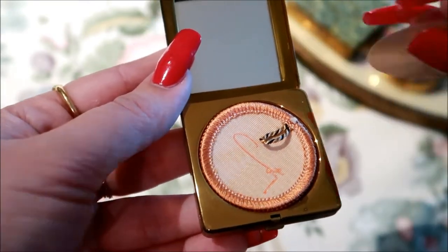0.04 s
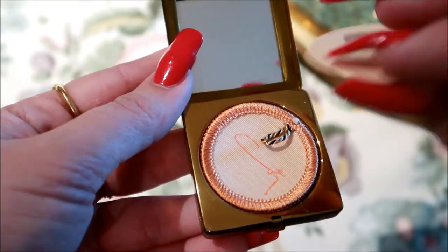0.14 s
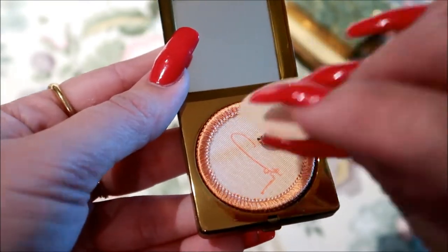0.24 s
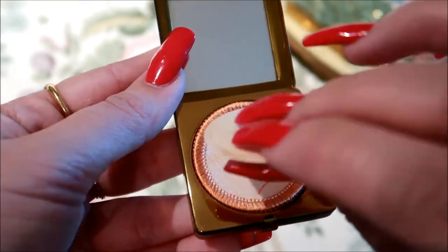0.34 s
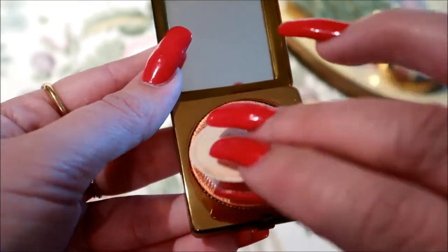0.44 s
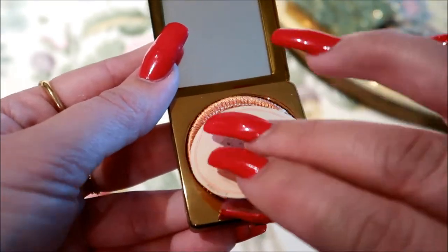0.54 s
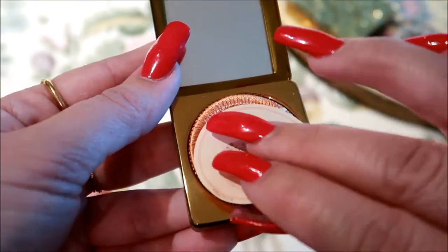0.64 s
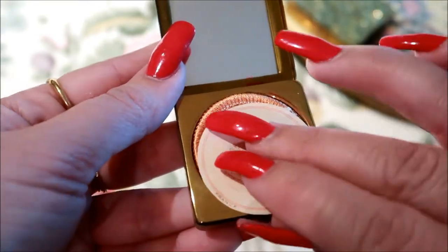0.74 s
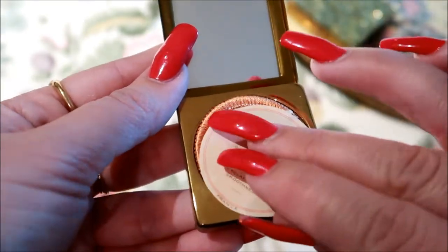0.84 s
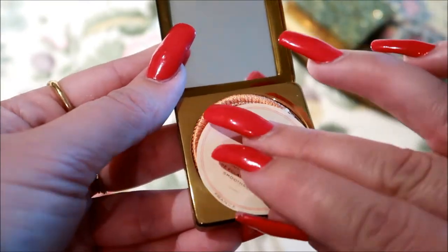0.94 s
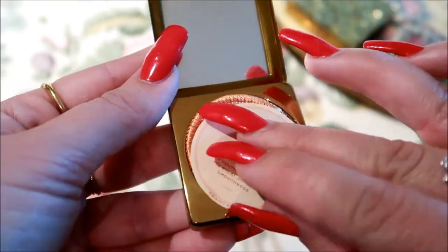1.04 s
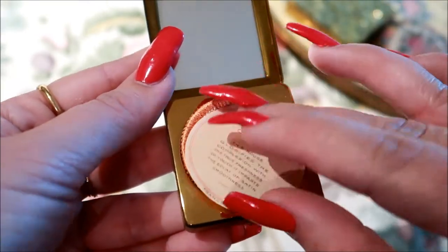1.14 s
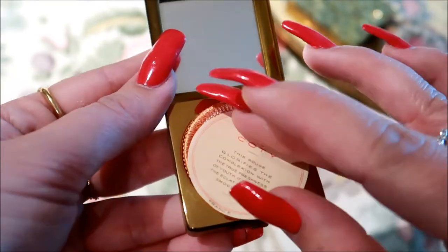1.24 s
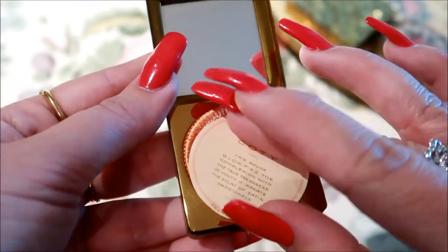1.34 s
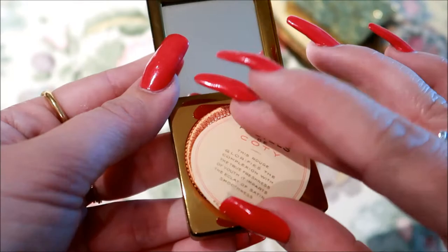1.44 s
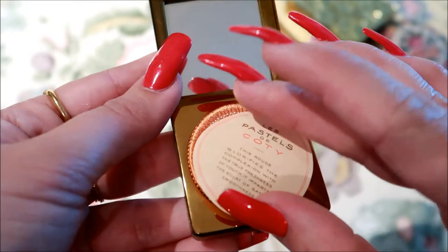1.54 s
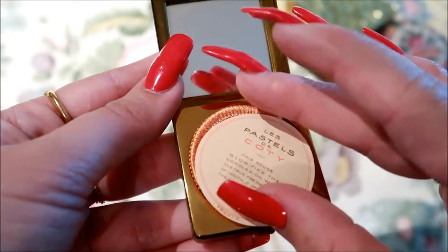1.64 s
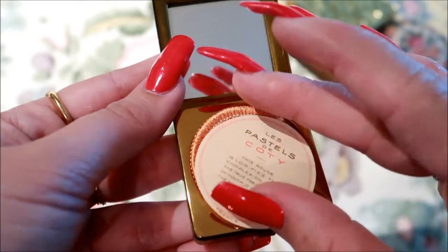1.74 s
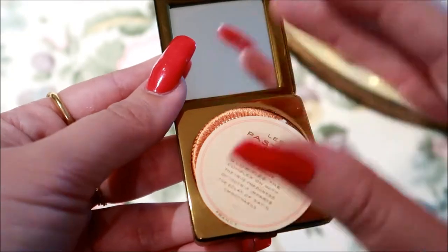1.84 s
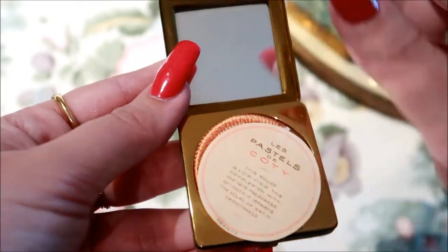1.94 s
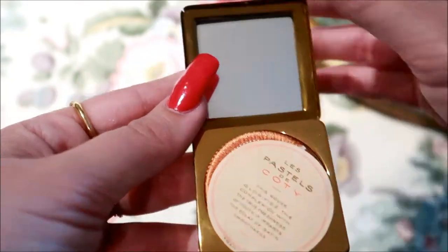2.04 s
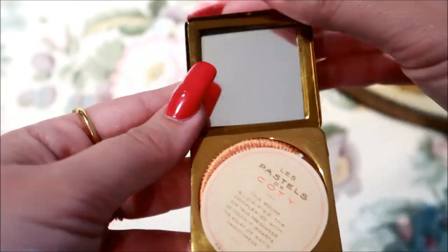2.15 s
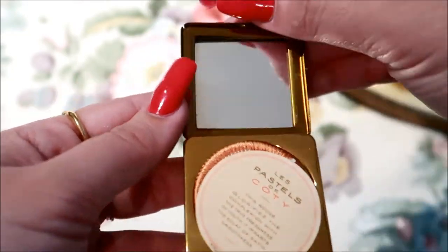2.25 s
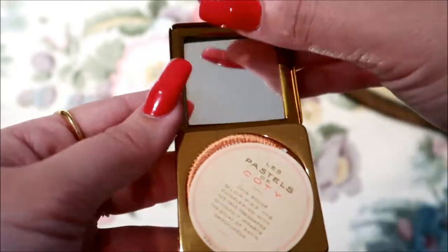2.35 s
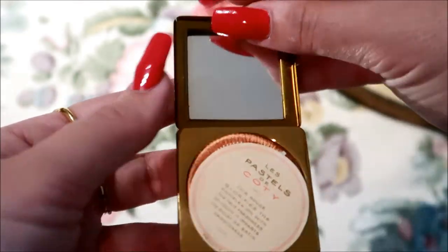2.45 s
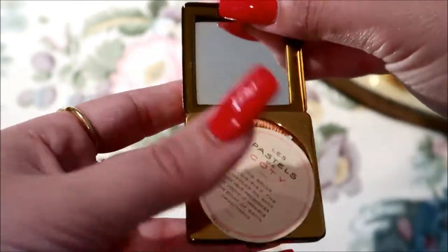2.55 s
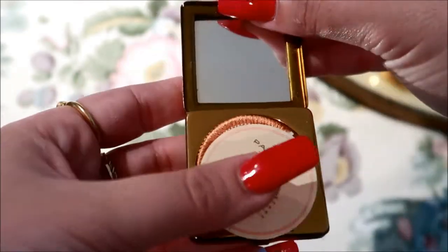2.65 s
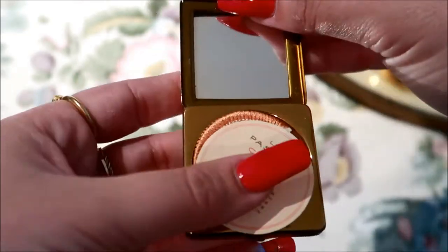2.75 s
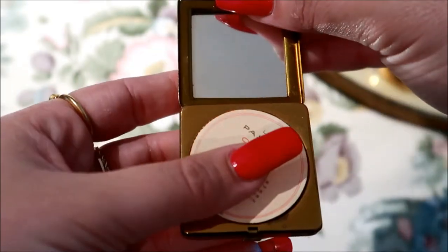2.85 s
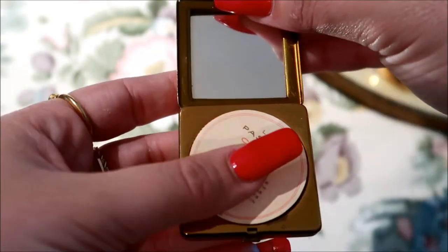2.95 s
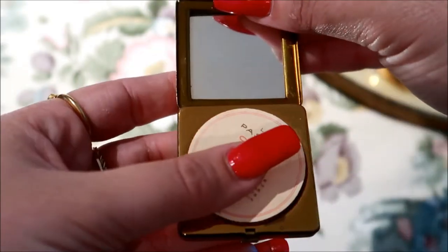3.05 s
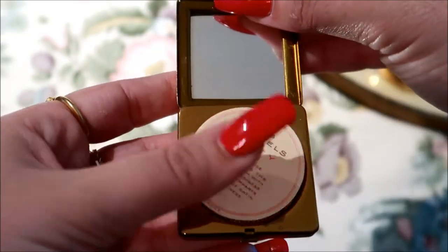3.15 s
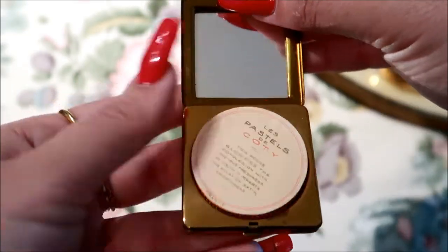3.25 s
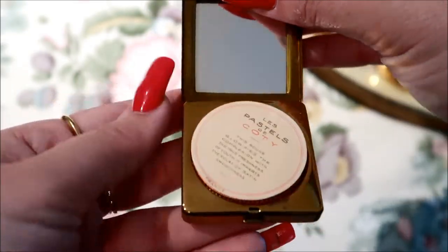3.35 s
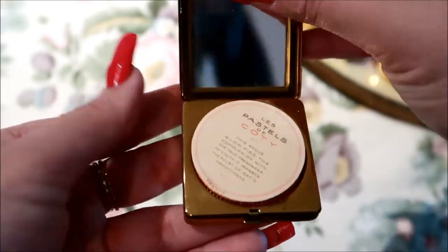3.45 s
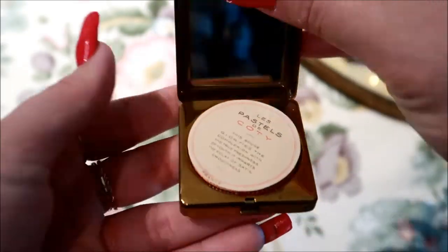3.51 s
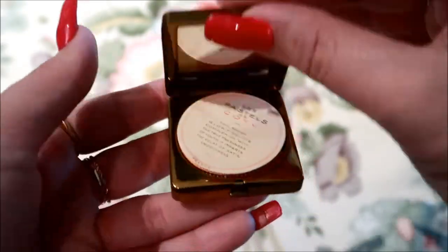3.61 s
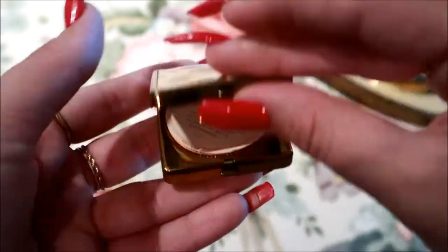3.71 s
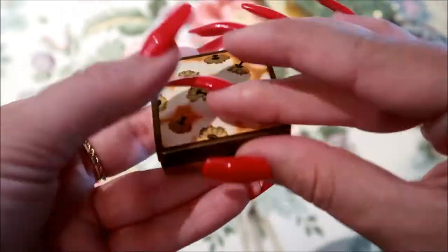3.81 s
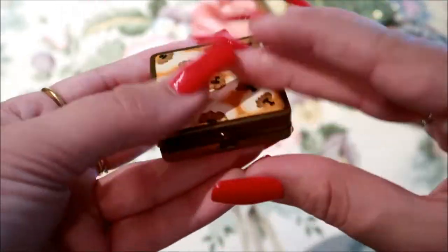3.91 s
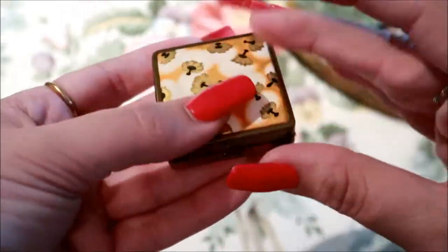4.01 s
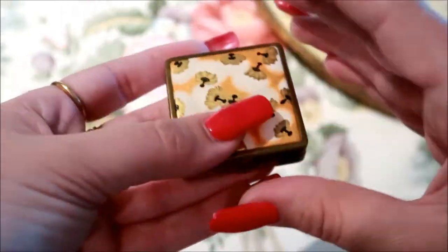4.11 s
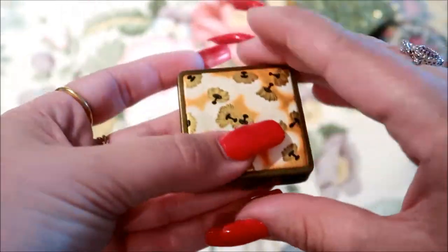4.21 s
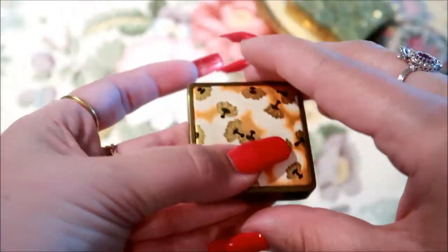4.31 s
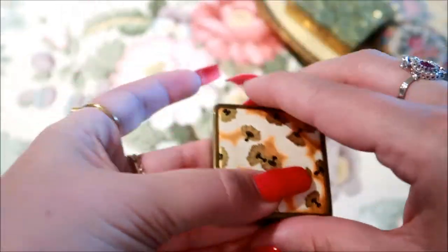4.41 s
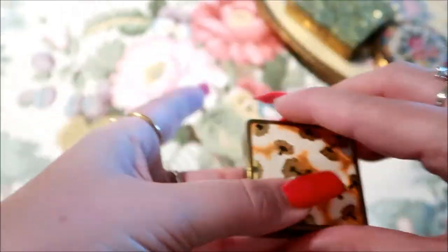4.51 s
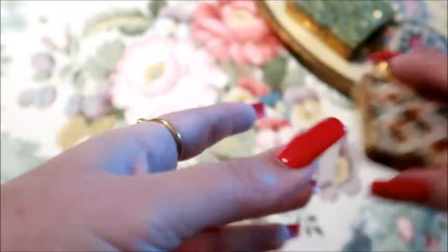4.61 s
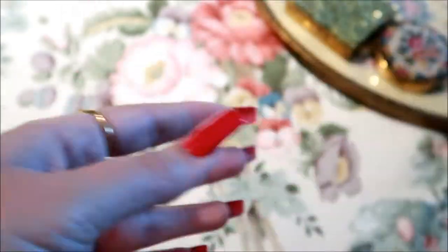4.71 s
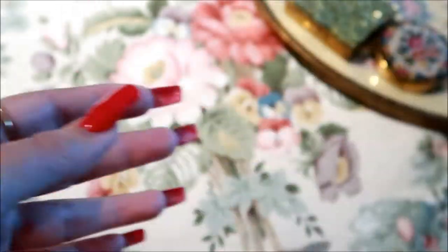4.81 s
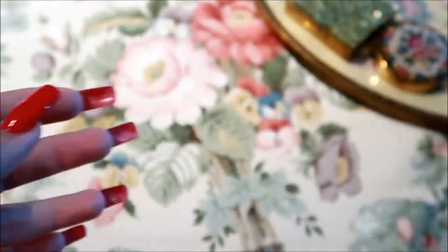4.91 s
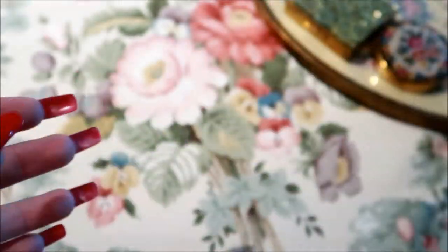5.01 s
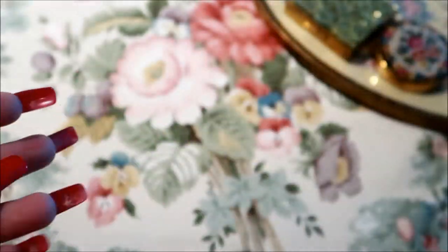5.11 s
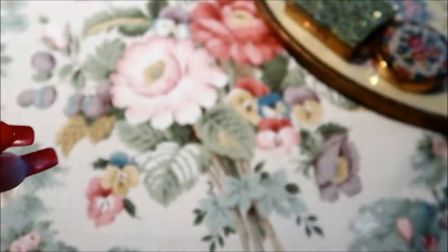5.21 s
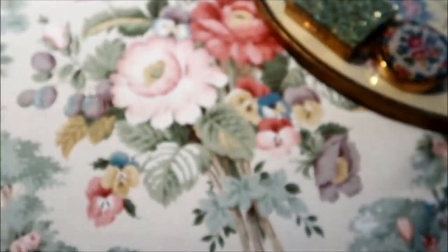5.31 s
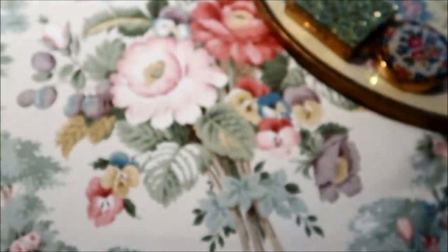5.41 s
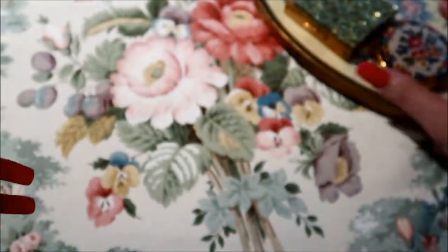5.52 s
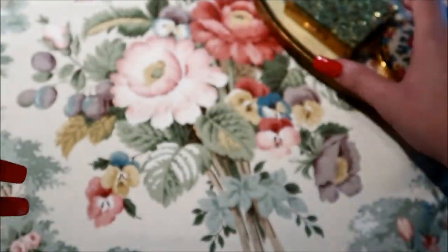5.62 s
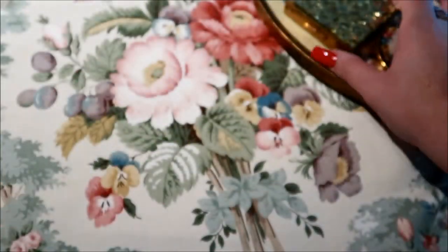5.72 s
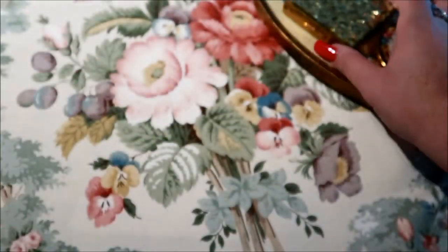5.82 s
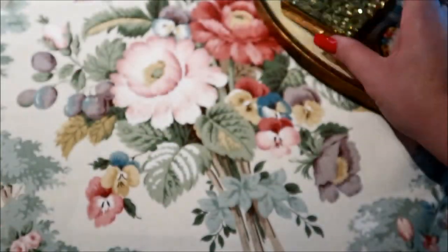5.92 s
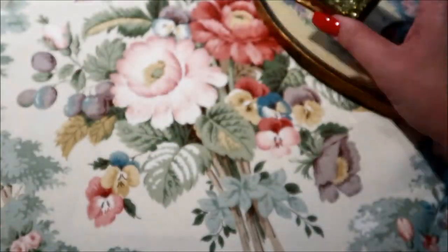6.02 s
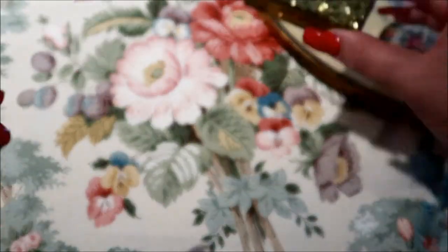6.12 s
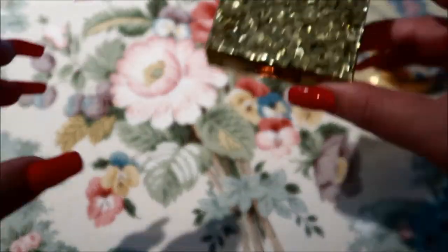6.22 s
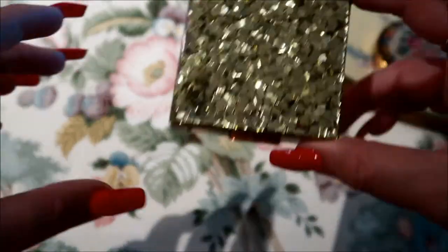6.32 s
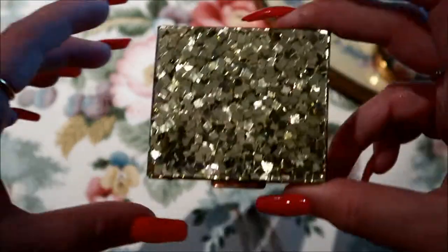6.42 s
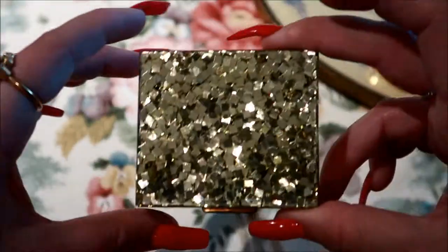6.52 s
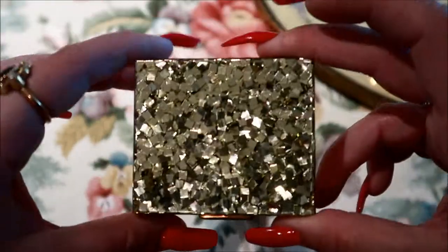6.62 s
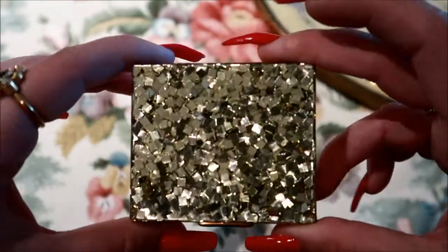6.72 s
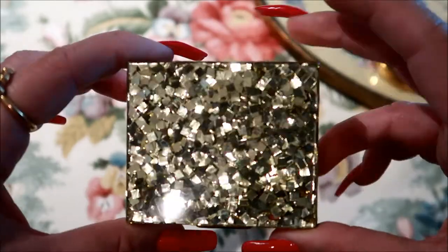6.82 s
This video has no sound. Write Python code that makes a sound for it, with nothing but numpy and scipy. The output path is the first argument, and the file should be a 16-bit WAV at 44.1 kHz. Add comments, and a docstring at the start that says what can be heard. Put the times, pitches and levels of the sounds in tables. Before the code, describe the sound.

Close to the microphone in a quiet room, a small metal compact is handled: irregular light fingernail clicks and soft slides of skin and nail, thinning out over time. A click precedes the crisp snap of the lid closing, the loudest sound. A lower knock follows as the compact lands on a table, then a few small clinks of another case against a tray. A faint motor hum and hiss lie underneath.

```python
"""Long fingernails tap and slide on a small metal powder compact, close by in a quiet room. The lid snaps
shut, the compact is set down on a table and a second case is lifted off a tray. Each contact is a short
force pulse that excites the damped normal modes of the body it meets; the room adds reflections.
Behind it all a motor hums faintly over microphone hiss."""
import sys
import numpy as np
from scipy import signal
from scipy.io import wavfile
from scipy.ndimage import uniform_filter1d

SR = 44100
rng = np.random.default_rng(int(sys.argv[2]) if len(sys.argv) > 2 else 0)


def wrap_up_sound(samples):
    """Save the sound to the file named by the first command line argument, as 16-bit audio."""
    columns = np.atleast_2d(samples).T
    # keep every value between -1 and 1, then stretch to whole-number steps
    tamed = np.clip(columns, -1, 1)
    steps = np.round(tamed * 32767).astype(np.int16)
    wavfile.write(sys.argv[1], SR, steps)


N = 302526


# Modes of the open compact: f/Hz, relative level/dB, T60/s
OPEN_MODES = [(344, 17, 0.025), (760, 8, 0.04), (1090, 4.5, 0.035), (571, 5, 0.0266), (1624, 6, 0.037),
              (1860, 11, 0.024), (2230, 2, 0.033), (2620, 11.5, 0.01), (3150, 1.5, 0.029), (3740, 4, 0.029),
              (4140, 6, 0.02), (4484, 10.5, 0.0083), (5800, 4, 0.005), (6915, -0.5, 0.018),
              (7700, 4.5, 0.012), (9700, 10, 0.0048)]
# Bursts that make up the taps: t/s, level/dB (rms if packed into 1 ms), centre/octaves above 1 kHz,
# breadth/octaves, burst time/ms, factor on T60 (small when fingers damp the body).
# A fading ring opens; the tap at 0.363 s has two layers, a broad click and a narrow ring near 1.7 kHz.
TAP_BURSTS = [(0.0, -33.5, 1.74, 0.85, 22, 0.39), (.2055, -50.5, 3.1, 0.9, 0.43, 0.67),
              (.287, -37, 0.19, 1.3, 5.8, .35), (.3632, -27.5, 0.5, 2.7, 0.46, 0.52),
              (.3637, -28.5, 0.8, .3, .5, 0.66), (.3772, -30.5, 0.2, 2.2, 2.3, 0.59),
              (.603, -43, 1.53, 1, 3, 0.47), (.662, -29.5, 0.32, 1.6, 1.8, 0.38),
              (.714, -44.5, 1.64, 0.55, 2.5, 0.45), (.731, -44.5, 2.1, 0.59, 1.9, 0.43),
              (.8678, -29, 1.95, 1.3, 2.5, 0.3), (.871, -17.5, 2.04, 0.44, 0.3, 0.32),
              (.8728, -22.5, 0.63, 1, 0.73, 0.4), (.8842, -37, 2, 0.8, 0.5, .4),
              (1.008, -49, 2.25, 1.1, 1.5, 0.62), (1.3662, -28.5, 2, 4.8, 0.92, 0.44),
              (1.371, -27.5, 1.83, 1.2, 0.69, 0.34), (1.584, -34, 1.96, 0.48, 3.2, 0.32),
              (2.32, -45, 3.35, 2.4, 0.45, 0.52), (2.9165, -47, 2.8, .8, 0.87, 0.71),
              (2.9455, -39, 2.7, 1.6, 0.41, .5), (2.964, -46, .85, .3, 0.96, 0.66),
              (2.985, -46, 2.1, 1.2, 0.9, .5), (2.9942, -45, 2.7, 0.6, .7, .5),
              (3.001, -46, 2.3, 0.7, 0.81, 0.55), (3.9555, -38.5, 0.73, 0.57, 1.6, .5),
              (3.9595, -23.5, 1, 1.37, 0.18, 0.63), (3.974, -35.5, 3.2, 2.6, 0.42, 0.42),
              (4.023, -46, 1.8, 2.7, 0.59, .5), (4.0555, -40, 3.3, 1.3, 0.3, 0.31),
              (4.567, -43, 2.4, 0.6, 0.81, .5), (4.667, -40.5, 3, 0.82, 0.26, .5)]
def nail_taps():
    """Damped vibration: nail taps ring the open compact, some with a short echo about 14 ms later."""
    return modal_bursts(TAP_BURSTS, OPEN_MODES, crack_db=30, crack_t60=0.025)


# Strokes of skin and nail: t/s, duration/s, rms level/dB, centre/octaves above 1 kHz
STROKES = [(0.719, 0.11, -64, 2.36), (0.805, 0.09, -60.5, 2.4), (1.001, 0.12, -70.5, 2.05),
           (1.213, 0.15, -67, 2.34), (1.633, 0.061, -65.5, 2.14), (1.726, 0.0578, -60, 2.13),
           (1.917, 0.067, -64.5, 1.85), (2.922, 0.066, -55, 2.65), (2.972, 0.047, -60.5, 2.2),
           (4.64, 0.041, -60, 2.8)]
def finger_slides(grain_db):
    """Stick-slip friction: dense slips of uneven size lightly ring the damped compact."""
    out = np.zeros(N)
    body = modal_response(OPEN_MODES, rng.standard_normal(1024), ring=0.46, crack_db=29, crack_t60=0.034)
    for start, duration, db, centre in STROKES:
        stroke = np.hanning(round(duration * SR))
        slips = rng.standard_normal(len(stroke))
        slips *= gain_of(grain_db * np.minimum(rng.exponential(size=len(stroke)), 4))
        rub = contact_filter(signal.fftconvolve(slips * stroke, body), centre, breadth=0.93)
        add(out, start, gain_of(db) * unit_rms(rub))
    return out


# Modes of the shut compact: f/Hz, relative level/dB, T60/s
SHUT_MODES = [(397, -15, 0.012), (794, 7, 0.016), (1000, 6.5, 0.012), (1770, 0, 0.015), (2320, -8, 0.013),
              (3134, 0.5, 0.0093), (3520, 0.5, 0.012), (4400, -16, 0.011), (5700, -11, 0.01),
              (6650, -2, 0.0095), (7250, -5, 0.01)]
# Bursts of the lid: t/s, level/dB, centre/octaves, breadth/octaves, burst time/ms, factor on T60
LID_BURSTS = [(4.2945, -19.5, 1.36, 1.4, 0.9, 1), (4.2961, -6, 1.12, 2.4, 0.34, 0.92),
              (4.439, -37.5, -0.34, 0.67, 1.02, 0.53)]
def lid_snap():
    """Impulsive excitation: the lid's brief, hard contact rings the fast-decaying shut case."""
    return modal_bursts(LID_BURSTS, SHUT_MODES, crack_db=15.5, crack_t60=0.011)


# Modes of the table top: f/Hz, relative level/dB, T60/s
TABLE_MODES = [(85.4, 6, 0.29), (198, 7.5, 0.19), (278, -5, 0.086), (410, 2.5, 0.093), (640, 7, 0.047),
               (950, 6.5, 0.087), (1030, 3, 0.11), (1318, 8.5, 0.049), (1730, -8, 0.055), (2020, -6, 0.042),
               (2980, -4.5, 0.039), (4850, 0, 0.025)]
# Bursts of the landing: t/s, level/dB, centre/octaves, breadth/octaves, burst time/ms, factor on T60
LANDING_BURSTS = [(5.26, -19.5, -0.35, 2.1, 2.5, 0.37), (5.2835, -10, 0.48, 2.4, 1.6, 0.48),
                  (5.297, -25, 0.31, 1.6, 1.6, 0.52), (5.322, -29, 1, 1.9, 1.2, .4)]
def table_knock():
    """Free vibration: the table top rings on in its low modes after the compact lands."""
    return modal_bursts(LANDING_BURSTS, TABLE_MODES, crack_db=26.5, crack_t60=0.091)


# Modes of the tray: f/Hz, relative level/dB, T60/s
TRAY_MODES = [(332, 21.5, 0.022), (764, 8.5, 0.054), (1170, 12, 0.021), (1790, 3.5, 0.057),
              (2150, 4.5, 0.028), (2960, 0, 0.028), (3160, 3.5, 0.04), (3520, -4.5, 0.018),
              (4000, -7, 0.041), (5030, -7, 0.069), (6200, 10.5, 0.0093), (7400, 6, 0.013)]
# Bursts of the lifting: t/s, level/dB, centre/octaves, breadth/octaves, burst time/ms, factor on T60
LIFT_BURSTS = [(5.8535, -27, 1.7, 0.85, 2, 0.61), (5.859, -33.5, 2, 0.92, 1.2, 0.41),
               (5.8858, -24.5, 1.8, 0.68, 1.5, 0.99), (5.967, -27.5, 1.9, 1.4, 0.54, .4),
               (5.9855, -28.5, 0.27, 1.2, 4.7, 0.62), (6.174, -35.5, 0.29, 0.24, 1.4, 0.3)]
def tray_clatter():
    """Repeated impact: a second case knocks the tray as it is lifted off."""
    return modal_bursts(LIFT_BURSTS, TRAY_MODES, crack_db=28.5, crack_t60=0.023)


def modal_bursts(rows, modes, crack_db, crack_t60):
    """Convolution: each row is a burst of noise that builds and dies, sent through the body's modes."""
    out, t = np.zeros(N), np.arange(4096) / SR
    for start, db, centre, breadth, burst_ms, ring in rows:
        burst_noise, body_noise = rng.standard_normal((2, 8192))
        burst = whiten(burst_noise[:len(t)] * t * np.exp(-2000 * t / burst_ms))
        body = modal_response(modes, body_noise, ring, crack_db, crack_t60, grip=0.0033)
        sound = contact_filter(signal.fftconvolve(burst, body)[:8192], centre, breadth)
        rms_in_1ms = np.sqrt(np.sum(sound ** 2) / SR * 1000)
        add(out, start, gain_of(db) * sound / rms_in_1ms)
    return out


def modal_response(modes, noise, ring, crack_db, crack_t60, grip=0):
    """Modal superposition: clear resonances stand on a crack of modes too dense to tell apart."""
    hz, t = abs(np.fft.fftfreq(len(noise), 1 / SR)), np.arange(len(noise)) / SR
    power = gain_of(crack_db) ** 2
    for (mode_hz, db, t60), shift in zip(modes, grip * noise[::-1]):
        detuning = 2 * np.pi * (hz - mode_hz * (1 + shift))  # each grip bends the modes a little
        damping = np.log(1000) / (t60 * ring)
        power = power + (gain_of(db) * SR / 2) ** 2 / (damping ** 2 + detuning ** 2)
    crack = whiten(gain_of(-60 * t / (crack_t60 * ring)) * noise)
    return np.fft.ifft(np.fft.fft(crack) * minimum_phase(np.log(power) / 2)).real


def contact_filter(x, centre, breadth, steepness=1.22):
    """Selective excitation: a contact's place and hardness pick a bell-shaped band of the spectrum."""
    octave = np.log2(abs(np.fft.fftfreq(len(x), 1 / SR)) / 1000 + 1e-3)
    log_gain = -steepness * np.log1p(((octave - centre) / breadth) ** 2)
    log_gain -= np.exp(4.4 * (octave - 3.85))  # above about 10 kHz the treble of every hit and rub fades, whatever the contact
    return np.fft.ifft(np.fft.fft(x) * minimum_phase(log_gain)).real


def whiten(burst, gap_share=0.4):
    """Inverse filtering: the spectrum evens out; the scatter in time and the deepest gaps stay."""
    spectrum = np.fft.fft(burst)
    magnitude = abs(spectrum) + gap_share * abs(spectrum).mean() + 1e-9
    return np.fft.ifft(spectrum / minimum_phase(np.log(magnitude))).real


def minimum_phase(log_gain):
    """Causality: the Hilbert transform gives the phase that belongs to a log gain."""
    return np.conj(np.exp(signal.hilbert(log_gain)))


def gain_of(db):
    """Amplitude ratio of a level in decibels."""
    return 10 ** (np.asarray(db) / 20)


def unit_rms(x):
    """Normalisation to rms 1."""
    return x / np.sqrt(np.mean(x ** 2) + 1e-20)


def curve_at(points, hz):
    """Interpolation on a log-frequency axis."""
    f, value = np.transpose(points)
    return np.interp(np.log(hz + 1), np.log(f + 1), value)


def add(mix, start, sound):
    """Superposition of a sound from start/s on."""
    part = mix[max(round(start * SR), 0):][:len(sound)]
    part += sound[:len(part)]


def direct_path(x, pan_db, lag_samples, shade_db):
    """Diffraction: the housing bends treble differently to two ports; level and delay pan the sound."""
    housing = whiten(rng.standard_normal(256) * np.hanning(256) * (np.arange(256) < 40))
    side = gain_of(shade_db) * signal.oaconvolve(np.diff(x, prepend=0), housing)[:N]
    left = np.roll(x, lag_samples) * gain_of(pan_db / 2) + side
    right = x * gain_of(-pan_db / 2) - side
    return np.array([left, right])


# Early reflections off table top, hands and walls: t/s, level/dB
REFLECTIONS = [(.0035, -27.5), (.0065, -15.5), (0.014, -21.5)]
# Reverberation time: f/Hz, T60/s
ROOM_DECAY = [(200, 0.32), (1000, 0.29), (4000, 0.28), (10000, 0.24)]
def room(x, tail_db=-14.5):
    """Reverberation: a few single echoes, then sparse reflections, each band dying at its own rate."""
    pulses = np.zeros((2, SR // 2))
    slots = np.arange(400, SR // 2 - 20, 20)  # the tail starts after 9 ms
    arrivals = slots + rng.integers(0, 20, (3, len(slots)))
    sign = rng.choice([-1., 1.], arrivals.shape)
    np.put_along_axis(pulses, arrivals[:2], 0.25 * sign[:2], 1)
    pulses[:, arrivals[2]] += sign[2]  # the microphone ports sit close and share much of the tail
    hz, t, bands = signal.stft(pulses, SR, nperseg=256)
    decay = gain_of(-60 * t / curve_at(ROOM_DECAY, hz)[:, None])
    tail = signal.istft(bands * decay, SR, nperseg=256)[1]
    tail *= gain_of(tail_db) / np.linalg.norm(tail[0])
    soft_echo = np.hanning(9) / 4  # cloth and skin dull the echoes
    for delay, db in REFLECTIONS:
        for port, skew in zip(tail, rng.integers(0, 4, 2)):
            add(port, delay + skew / SR, gain_of(db) * soft_echo)
    return signal.fftconvolve(x[None], tail, axes=1)[:, :N]


# Motor lines: f/Hz, nominal level/dB, linewidth/Hz
MOTOR_LINES = [(59.8, -64, 2.9), (120.6, -61.5, 2.4), (176, -59.5, 4.1), (272.4, -63, 18)]
def motor_hum(steady, whine_hz=11390, whine_db=-88):
    """Random modulation: each motor line wavers about a steady tone; a thin whine lies above."""
    t, out = np.arange(N) / SR, np.zeros(N)
    for hz, db, width in MOTOR_LINES:
        pole = np.exp(-np.pi * width / SR)
        waver = unit_rms(signal.lfilter([1], [1, -pole], rng.standard_normal((2, N + SR)))[:, SR:])
        envelope = (steady + waver[0] + 1j * waver[1]) / np.hypot(steady, 1)
        out += gain_of(db) * (envelope * np.exp(2j * np.pi * hz * t)).real
    return out + gain_of(whine_db) * np.sin(2 * np.pi * whine_hz * t)


# Noise floor: f/Hz, relative spectral level/dB
NOISE_SPECTRUM = [(12, -42), (20, -5), (70, -1.5), (123, -9.5), (182, -2.5), (222, -7), (270, -5.5),
                  (660, -15.5), (1530, -19), (5680, -27.5), (11100, -37.5), (13500, -40), (16000, -71)]
# Likeness of the noise at the two ports: f/Hz, correlation coefficient
NOISE_CORRELATION = [(60, 1), (180, 0.65), (550, -0.12), (1650, -0.053), (4970, -0.2), (15000, -0.0031)]
def hiss(rms_db=-54.5, flicker_db=1.43):
    """Partial coherence: room rumble is alike at both ports, the microphone hiss above it is not."""
    frames, hz = N // 512 + 5, np.fft.rfftfreq(2048, 1 / SR)
    a, b, c, d, flicker = rng.standard_normal((frames, 1025, 5)).T
    flicker = unit_rms(uniform_filter1d(uniform_filter1d(flicker, 12, 0), 8, 1))
    correlation = curve_at(NOISE_CORRELATION, hz)[:, None]
    left = a + 1j * b
    right = correlation * left + np.sqrt(1 - correlation ** 2) * (c + 1j * d)
    colour = gain_of(curve_at(NOISE_SPECTRUM, hz)[:, None] + flicker_db * flicker)
    spectra = np.array([left, right]) * colour / np.sqrt(1 + correlation)
    noise = signal.istft(spectra, nperseg=2048, noverlap=1536)[1][:, :N]
    return gain_of(rms_db) * noise / noise.mean(0).std()


def scene():
    """Superposition of direct and reflected sound: hands in front, table and tray to the right."""
    hands = nail_taps() + finger_slides(grain_db=5.0) + lid_snap()
    table = table_knock()
    tray = tray_clatter()
    reflected = room(hands + gain_of(6.5) * (table + tray))
    direct = direct_path(hands, pan_db=-0.33, lag_samples=0, shade_db=-7)
    direct += direct_path(table, pan_db=-1.6, lag_samples=1, shade_db=8)
    direct += direct_path(tray, pan_db=-1.3, lag_samples=1, shade_db=-15)
    return direct + reflected + hiss() + motor_hum(steady=0.98)


def record(dry):
    """Band limiting: a linear-phase low-pass cuts off at 15.8 kHz."""
    low_pass = signal.firwin(255, 15800, window=("kaiser", 9), fs=SR)
    return signal.oaconvolve(dry, low_pass[None], "same")


dry = scene()
out = record(dry)
wrap_up_sound(out)
```